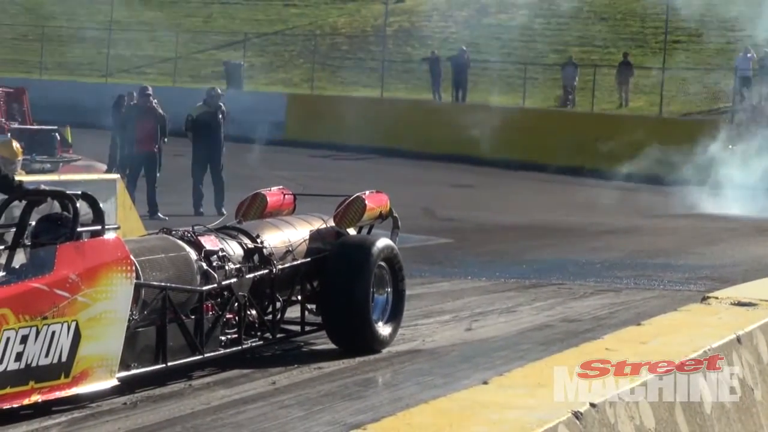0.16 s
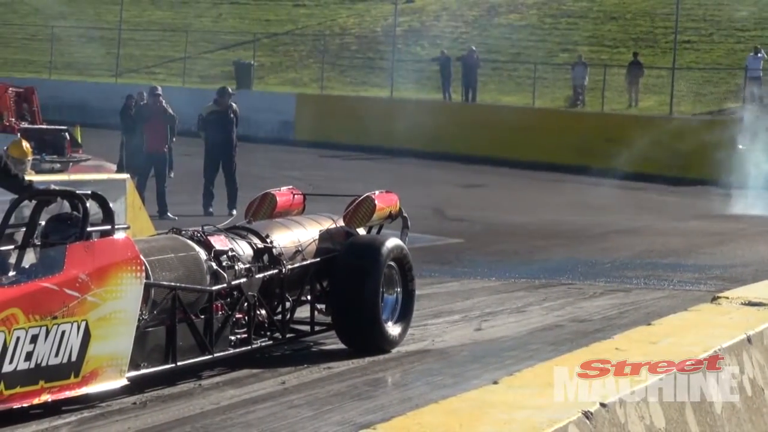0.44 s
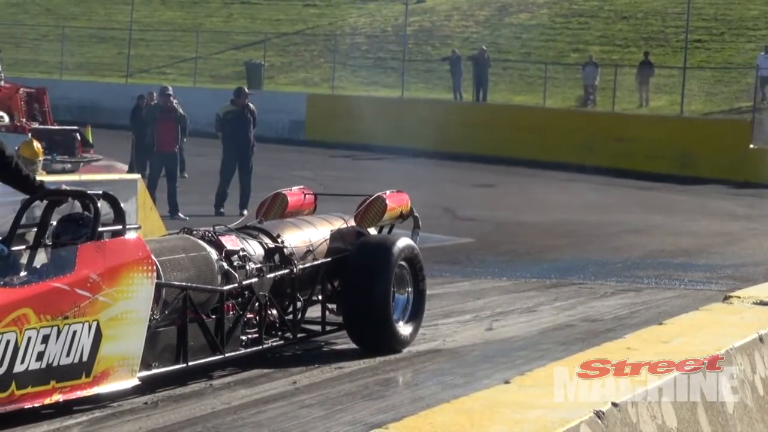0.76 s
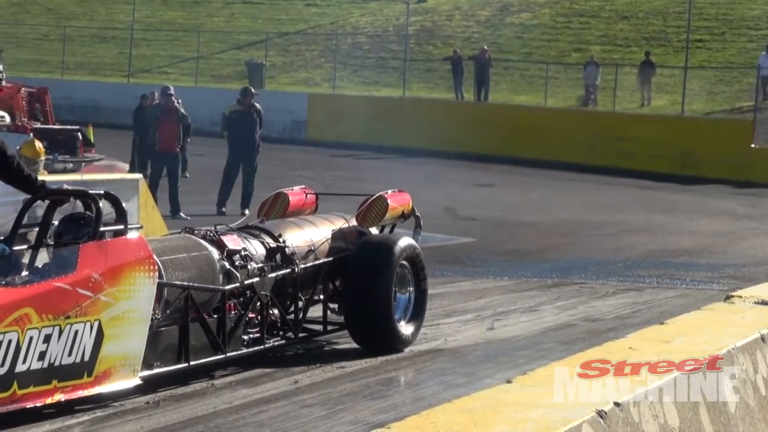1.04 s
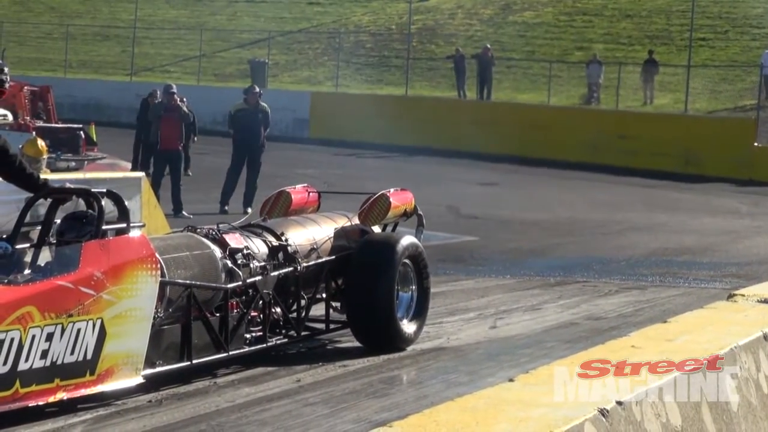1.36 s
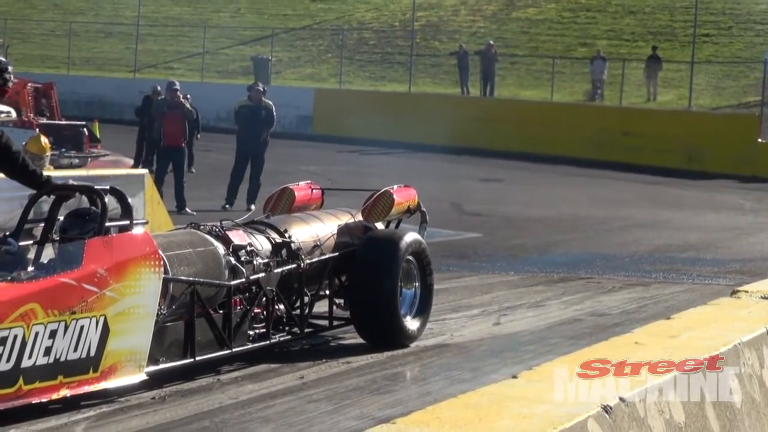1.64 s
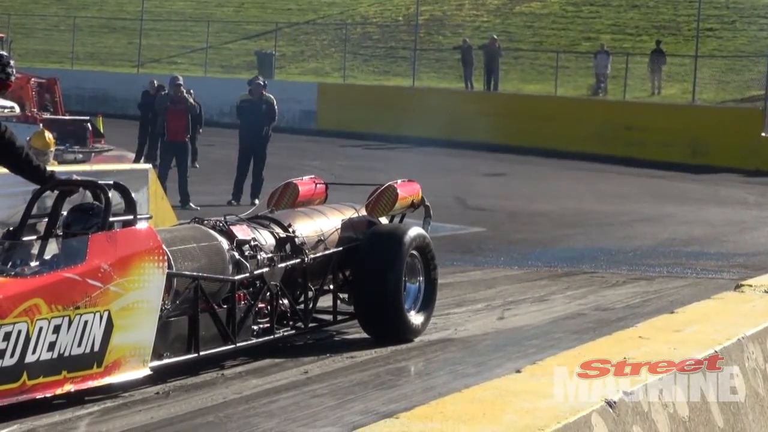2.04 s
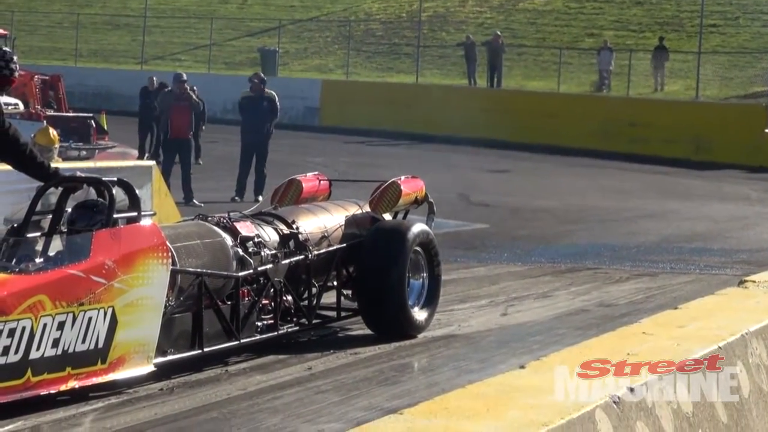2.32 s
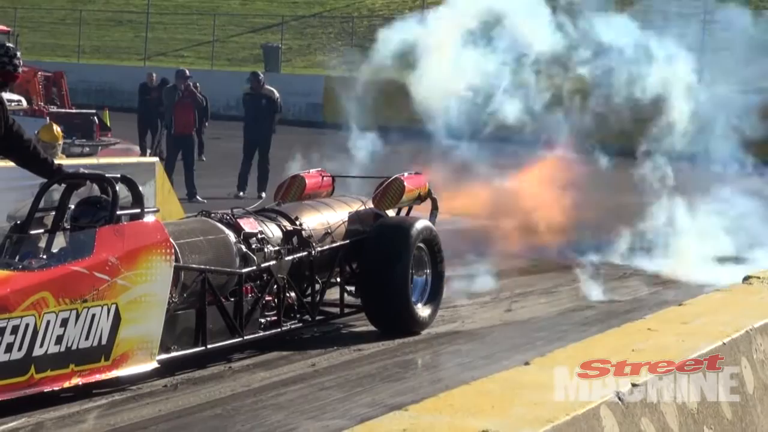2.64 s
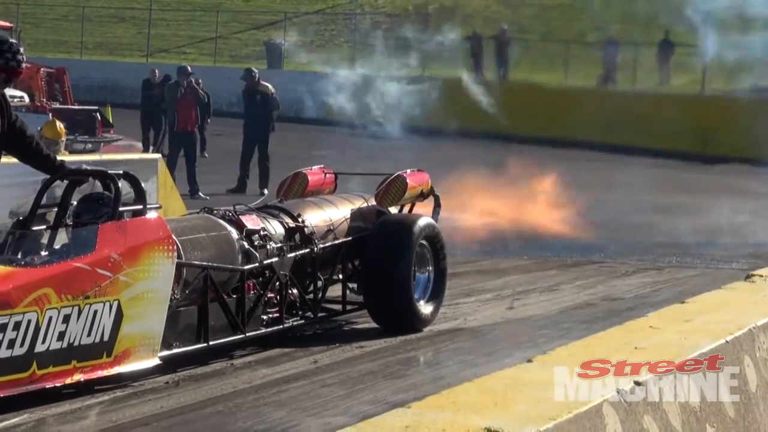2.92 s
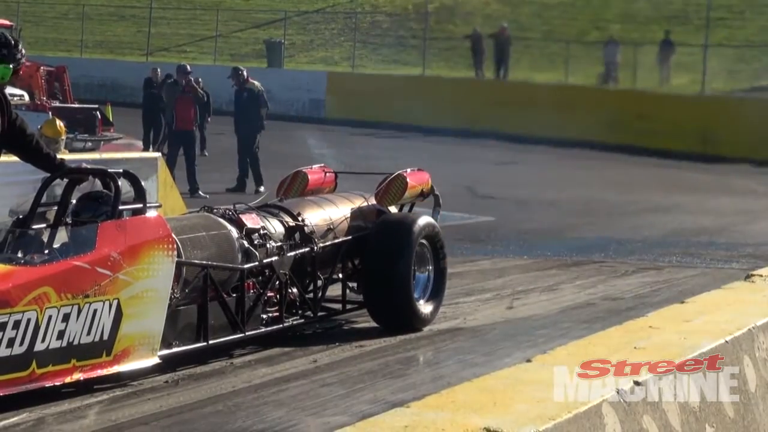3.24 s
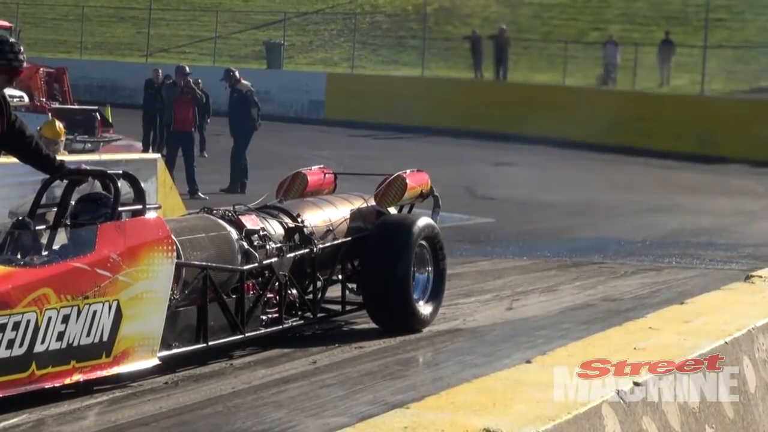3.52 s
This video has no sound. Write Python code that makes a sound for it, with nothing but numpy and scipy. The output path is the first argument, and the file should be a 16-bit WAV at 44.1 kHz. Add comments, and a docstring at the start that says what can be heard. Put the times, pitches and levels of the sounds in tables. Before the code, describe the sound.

A jet engine roars loudly with a shrill, wavering turbine whine, then an afterburner blast rumbles and crackles

```python
"""A jet dragster idles up on the start line, first with the fading afterglow of an earlier flame.
Intake and exhaust roar as flickering noise; the compressor blades whine as sines that climb in pitch.
Then the afterburner lights for about two thirds of a second: low noise rumbles, and its drag on the
shaft makes the whine sink. Its pressure surges overload the microphone, blanking the treble for an
instant. After the cut a faint glow of rumble dies away and the whine begins to climb again."""
import sys
import numpy as np
from scipy import signal
from scipy.fft import rfft, irfft, next_fast_len
from scipy.io import wavfile

SR = 44100
rng = np.random.default_rng(int(sys.argv[2]) if len(sys.argv) > 2 else 0)


def materialize(psi):
    """Save the field psi as 16-bit PCM at rate SR to the path in sys.argv[1].

    A 1-D psi becomes a single channel; in a 2-D psi each row is a channel.
    """
    bounded = np.clip(np.atleast_2d(psi).T, -1, 1)
    quanta = np.round(bounded * 32767).astype(np.int16)
    wavfile.write(sys.argv[1], SR, quanta)


N = 162288
T = np.arange(N) / SR   # time of every sample, in seconds


def amp(db):
    """Turn dB into a plain gain."""
    return 10 ** (np.asarray(db) / 20)


def rms_one(x):
    """Scale a signal to an rms of 1."""
    return x / np.sqrt(np.mean(x ** 2) + 1e-20)


def in_time(rows, column=1):
    """Read one table column at every sample, with straight lines between the rows."""
    rows = np.array(rows)
    return np.interp(T, rows[:, 0], rows[:, column])


def at_hz(points, hz):
    """Read a spectrum table at the given frequencies, on a log frequency axis."""
    points = np.array(points)
    return np.interp(np.log(hz), np.log(np.maximum(points[:, 0], 1)), points[:, 1])


def drift(rate):
    """Random wandering with a spread of about 1: noise smoothed by a low-pass at `rate` Hz."""
    step = 40   # samples between computed points
    pole = np.exp(-2 * np.pi * rate * step / SR)
    noise = rng.standard_normal(N // step + 2002)
    smooth = signal.lfilter([1], [1, -2 * pole, pole * pole], noise)[2000:]   # drop the filter's start
    return np.interp(np.arange(N) / step, np.arange(len(smooth)), rms_one(smooth))


# How the shared part of the noise leans between the ears.
# Each row: frequency in Hz, left minus right in dB.
EAR_BALANCE = [(60, 1), (110, -1), (200, 0.5), (380, 0.5), (700, 3), (1290, 2), (2380, 3.5), (4400, 3),
               (8120, 1.0), (15000, 0.5)]
TOP_HZ = 6800   # bands centred above this also follow top_db


def turbulence(spectrum, wide, wide_db, patchy_db, rate, top_db=0):
    """Turbulent air: coloured stereo noise scaled to rms 1, then split into bands that each flicker."""
    size = next_fast_len(N)
    hz = np.maximum(np.arange(size // 2 + 1) * SR / size, 1)
    lowest, highest = spectrum[0][0], spectrum[-1][0]
    outside = np.maximum(hz / highest, lowest / hz).clip(1)
    beyond_db = -24 * np.log2(outside)   # falls 24 dB per octave outside the table
    mid_db = at_hz(spectrum, hz) + beyond_db
    side_db = at_hz(wide, hz) + wide_db + beyond_db
    mid, side = rfft(rng.standard_normal((2, size))) * amp([mid_db, side_db])
    left = amp(at_hz(EAR_BALANCE, hz) / 2)
    pair = np.array([mid * left + side, mid / left - side])
    pair = pair / np.std(irfft(pair, size))
    out, together = 0, drift(rate)
    for centre in 22 * 2 ** np.arange(0, np.log2(highest / 11), .5):
        # overlapping triangles, half an octave apart
        window = np.clip(1 - 2 * abs(np.log2(hz / centre)), 0, 1)
        band = irfft(pair * window, size)[:, :N]
        flicker_db = patchy_db * (.4 * together + drift(rate))
        out = out + band * amp(flicker_db + (top_db if centre > TOP_HZ else 0))
    return out


# Colour of the jet's roar, the part both ears share.
# Each row: frequency in Hz, level per Hz in dB (only the shape counts).
ROAR_COLOUR = [(25, 13), (55, 10), (70, 4.5), (90, 2), (125, -7), (175, 1), (210, -3.5), (270, 0.5),
               (450, -8.5), (600, -7), (650, -1), (800, -3), (1100, -4.5), (1420, -2), (1700, -1),
               (2100, -0.5), (2550, -2), (2900, 1), (4700, -1), (5200, -0.5), (5700, 3.5), (6200, -3),
               (7000, -6.5), (8200, 2), (9500, 0), (10900, -5.5), (11600, -1.5), (12000, -7.5), (12400, -1),
               (13000, -4.5), (13300, -5), (13900, -9), (15700, -13.5)]
# Colour of the roar's diffuse part, which differs between the ears.
# Each row: frequency in Hz, level per Hz in dB before ROAR_WIDE_DB is added.
ROAR_WIDE_COLOUR = [(40, -30), (230, -8.5), (726, -0.5), (2410, -1), (3170, -3), (6070, -6.5), (9400, -2),
                    (10800, -11), (12000, -11), (13500, -18), (15700, -28)]
# How the roar swells and sinks. Each row: time in seconds, level in dB before ROAR_DB is added,
# extra level of the bands above TOP_HZ in dB.
ROAR_SWELL = [(0.0, -22.5, -3), (0.04, -23, 0.5), (0.23, -21.5, -1.5), (0.44, -22.5, -0.5), (0.68, -21, -2),
              (1.45, -21.5, 2.5), (1.52, -21.5, -0.5), (1.99, -21.5, 0.5), (2.02, -23, -1),
              (2.16, -21.5, 1), (2.44, -21.5, -0.5), (2.48, -20.5, -1.5), (2.68, -21.5, -1.5),
              (2.76, -21, -1.5), (3.09, -22, -1.5), (3.3, -21, 1.5), (3.54, -22.5, -2), (3.68, -22.5, 1.5)]
ROAR_DB, ROAR_WIDE_DB = 6, -6.5


def jet():
    """Intake and exhaust: turbulent air makes a broad roar whose top swells and sinks on its own."""
    top_db = in_time(ROAR_SWELL, column=2)
    noise = turbulence(ROAR_COLOUR, ROAR_WIDE_COLOUR, ROAR_WIDE_DB, patchy_db=0.65, rate=13.6, top_db=top_db)
    return amp(in_time(ROAR_SWELL) + ROAR_DB) * noise


# Pitch of the whine: how often blades pass, before a small random wobble.
# Each row: time in seconds, frequency in Hz.
BLADE_PITCH = [(0, 5467), (.25, 5520), (.5, 5578), (.75, 5629), (1, 5673), (1.3, 5715), (1.6, 5746),
               (2, 5777), (2.3, 5789), (2.55, 5804), (2.65, 5803), (2.75, 5773), (2.85, 5718), (3, 5649),
               (3.1, 5615), (3.2, 5584), (3.3, 5592), (3.45, 5625), (3.68, 5657)]
# The blade tone fades in and out in the turbulent air.
# Each row: time in seconds, rms level in dB before flutter and panning.
BLADE_LEVEL = [(0, -14), (.07, -21), (.15, -19.5), (.28, -38), (.34, -19.5), (.43, -24.5), (.5, -19.5),
               (.62, -18.5), (.67, -36), (.72, -30), (.75, -22), (.83, -21.5), (.89, -33), (.94, -22),
               (1.05, -30), (1.1, -25), (1.2, -35), (1.31, -27.5), (1.36, -34), (1.41, -23.5), (1.52, -25),
               (1.58, -24.5), (1.73, -17.5), (1.92, -36), (2.0, -17.5), (2.05, -12), (2.15, -16.5),
               (2.2, -39), (2.28, -34), (2.32, -18), (2.45, -29), (2.54, -19.5), (2.64, -33), (2.71, -15.5),
               (2.78, -36), (2.84, -18.5), (2.9, -28), (2.96, -17), (3.03, -28), (3.1, -18), (3.18, -37),
               (3.26, -21), (3.36, -27), (3.45, -20.5), (3.5, -20.5), (3.56, -15.5), (3.68, -22)]
# The tone an octave above. Each row: time in seconds, rms level in dB before flutter and panning.
OCTAVE_LEVEL = [(0, -27), (.2, -28.5), (.5, -38), (.76, -43), (.92, -24), (1.1, -31), (1.43, -25),
                (1.73, -40), (1.9, -23), (2.09, -42), (2.19, -27), (2.33, -34), (2.41, -30), (2.66, -38),
                (2.74, -27), (2.94, -31), (3.04, -46), (3.27, -33), (3.68, -36)]
# The tone six shaft orders below the blade tone.
# Each row: time in seconds, rms level in dB before flutter and panning.
LOWER_LEVEL = [(0, -46), (.3, -49), (.45, -29), (.6, -50), (.82, -37), (.97, -33), (1.05, -28.5),
               (1.27, -27.5), (1.47, -49), (1.69, -22.5), (1.91, -42), (2.1, -25), (2.23, -38), (2.33, -27),
               (2.6, -31), (2.84, -35), (3.68, -32)]
# Pitches of the faint tones. Each entry: multiple of the shaft speed.
FAINT_MULTIPLES = [46, 48, 49, 50, 59, 60, 94, 96.63, 100, 101, 102.59, 112]
# Their levels, in the same order. Each entry: rms level in dB before the swell, flutter and panning.
FAINT_LEVELS = [-30.5, -32.5, -36, -32, -37, -42, -46, -44, -39, -47, -41, -43]
# All faint tones swell together. Each row: time in seconds, change of level in dB.
FAINT_TOGETHER = [(0, -6), (.9, -5.5), (2.6, 1), (2.9, -3.5), (3.68, 1.5)]
BLADES, LOWER_ORDER = 53, 47   # multiples of the shaft speed
WOBBLE_HZ = 4.6   # spread of the blade pitch
FADE_PER_S = 13.5   # drift rate of the faint tones
FLUTTER, FLUTTER_PER_S = 0.25, 19.4   # share of a tone's height, drift rate
FLAME_FLUTTER, FLAME_FLUTTER_PER_S = 0.27, 26   # the same, added with the flame
WHINE_PAN_DB, WHINE_SIDE_DB = 3, -15   # left minus right; stray part that differs between the ears


def strong_tone_height(rows):
    """Height of a sine that follows a table of rms levels."""
    return np.sqrt(2) * in_time([(s, amp(db)) for s, db in rows])


def compressor():
    """Spinning blades: sines on multiples of shaft speed; three follow tables, the faint ones fade at random."""
    blade_hz = in_time(BLADE_PITCH) + WOBBLE_HZ * drift(8.3)
    shaft = 2 * np.pi * np.cumsum(blade_hz) / SR / BLADES   # turning angle in radians
    tones = [(BLADES, strong_tone_height(BLADE_LEVEL)),
             (2 * BLADES, strong_tone_height(OCTAVE_LEVEL)),
             (LOWER_ORDER, strong_tone_height(LOWER_LEVEL))]
    for order, db in zip(FAINT_MULTIPLES, FAINT_LEVELS):
        height = np.sqrt(2) * amp(db + in_time(FAINT_TOGETHER))
        tones.append((order, height * drift(FADE_PER_S)))
    out, flame = np.zeros((2, N)), burning()
    pan = amp([[WHINE_PAN_DB / 2], [-WHINE_PAN_DB / 2]])
    for order, gain in tones:
        turn = order * shaft + rng.uniform(0, 2 * np.pi)
        stray_height = amp(WHINE_SIDE_DB) * np.sqrt(np.mean(gain ** 2))
        stray = stray_height * drift(9.1) * np.cos(turn)
        flutter = FLUTTER * drift(FLUTTER_PER_S)
        flame_flutter = FLAME_FLUTTER * flame * drift(FLAME_FLUTTER_PER_S)
        gain = gain * (1 + flutter + flame_flutter)
        out += gain * np.sin(turn) * pan + stray * [[1], [-1]]
    return out


LIGHT_S, RISE_S, CUT_S, FALL_S = 2.572, 0.013, 3.21, 0.013   # seconds
AFTERGLOW_DB, AFTERGLOW_S = -13.5, 0.36   # s: time to fall to 37 %


def burning():
    """The flame's strength: it lights, rises, holds, is cut and dies, leaving an afterglow."""
    after = np.maximum(T - CUT_S, 0)
    glow = amp(AFTERGLOW_DB) * np.exp(-after / AFTERGLOW_S)
    rise = np.clip((T - LIGHT_S) / RISE_S, 0, 1)
    return rise * (np.exp(-after / FALL_S) + glow)


# Colour of the flame's rumble with the tailpipe's resonances, the part both ears share.
# Each row: frequency in Hz, level per Hz in dB (only the shape counts).
FLAME_COLOUR = [(25, 8), (55, 8.5), (72, 3), (98, 10), (122, -9), (160, 3), (200, -3.5), (228, 4),
                (250, -2.5), (278, 6), (300, -2.5), (330, -1), (450, -11.5), (660, -8), (1100, -17),
                (1500, -44)]
# Colour of the rumble's diffuse part, which differs between the ears.
# Each row: frequency in Hz, level per Hz in dB before FLAME_WIDE_DB is added.
FLAME_WIDE_COLOUR = [(24, -47), (40, -17), (92, -8), (324, 1.5), (622, -1), (856, -4), (923, -3),
                     (1500, -10), (1950, -40), (3300, -120)]
# Deep pressure surges of the flame.
# Each row: time of the peak in seconds, peak level in dB, length in seconds.
PRESSURE_SURGES = [(2.578, -8, 0.006), (2.59, 4.5, 0.0074), (2.606, -6, 0.0031), (2.633, -5, 0.0059),
                   (2.643, -11, .004), (2.654, 0, 0.0064), (2.668, 1.5, .006), (2.679, -2, 0.0082),
                   (2.692, -11, .005), (2.702, -4, 0.0075), (2.718, -3, 0.0052), (2.937, 0, 0.0068),
                   (3.171, -8, 0.0073), (3.19, 1.5, 0.011)]
FLAME_DB, FLAME_WIDE_DB = -18, -10
EARLIER_DB = -16   # afterglow of an earlier flame at the start, relative to the rumble
HEAVE_DB, HEAVE_HZ = -12.5, 50   # random heave: level at lighting, upper limit
HEAVE_SIDE_DB, HEAVE_CALMS_DB_PER_S = -10, 1   # part that differs between the ears; slow weakening


def afterburner():
    """Burning fuel in the tailpipe: lumpy low noise, a deep random heave and single bell-shaped surges."""
    low_pass = signal.butter(6, HEAVE_HZ, fs=SR, output="sos")
    slow = signal.sosfilt(low_pass, rng.standard_normal((2, N)))
    heave_db = HEAVE_DB - HEAVE_CALMS_DB_PER_S * np.maximum(T - LIGHT_S, 0)
    mid, side = amp(heave_db) * rms_one(slow)
    heave = mid + amp(HEAVE_SIDE_DB) * side * [[1], [-1]]
    surges = sum(amp(db) * np.exp(-8 * ((T - s) / length) ** 2) for s, db, length in PRESSURE_SURGES)
    noise = turbulence(FLAME_COLOUR, FLAME_WIDE_COLOUR, FLAME_WIDE_DB, patchy_db=0.9, rate=22)
    rumble = amp(FLAME_DB) * noise
    earlier = amp(EARLIER_DB) * np.exp(-T / AFTERGLOW_S) * rumble
    return burning() * (rumble + heave) + surges + earlier


def scene():
    """Roar, whine and flame sound together."""
    return jet() + compressor() + afterburner()


CAPSULE_TOP, PEAK_TOP = 0.82, .93   # ceilings of the capsule and of the clipping
BASS_CUT_HZ, CUTOFF_HZ, GAIN_DB = 116, 15720, 0.5


def record(dry):
    """The microphone capsule saturates, the deep bass is cut, high peaks clip, then the top is cut."""
    held = CAPSULE_TOP * np.tanh(dry / CAPSULE_TOP)
    bass_cut = signal.butter(3, BASS_CUT_HZ, "high", fs=SR, output="sos")
    thin = signal.sosfilt(bass_cut, held)
    clipped = np.clip(amp(GAIN_DB) * thin, -PEAK_TOP, PEAK_TOP)
    top_cut = signal.ellip(12, .5, 70, CUTOFF_HZ, fs=SR, output="sos")
    return signal.sosfilt(top_cut, clipped)


dry = scene()
out = record(dry)
materialize(out)
```